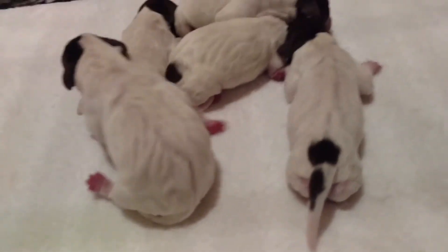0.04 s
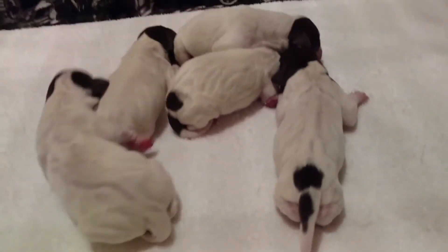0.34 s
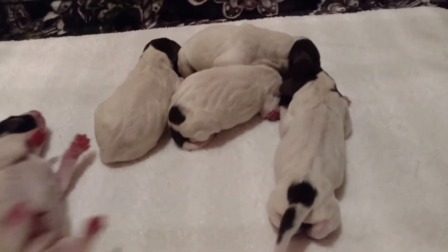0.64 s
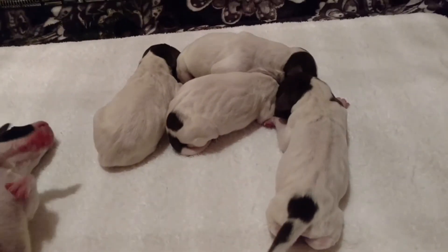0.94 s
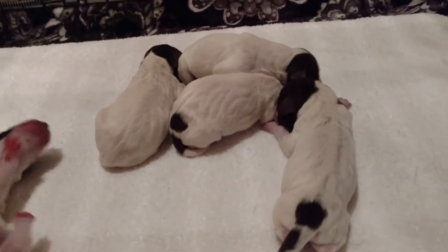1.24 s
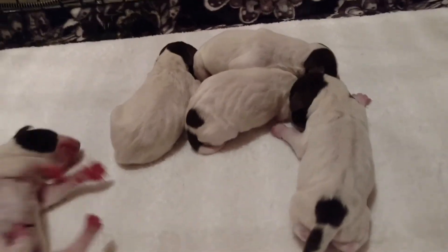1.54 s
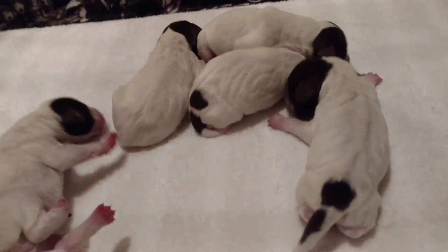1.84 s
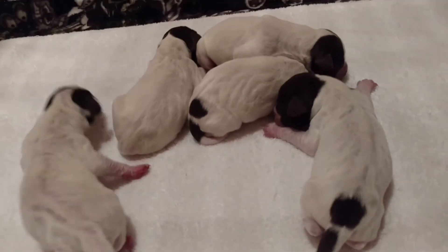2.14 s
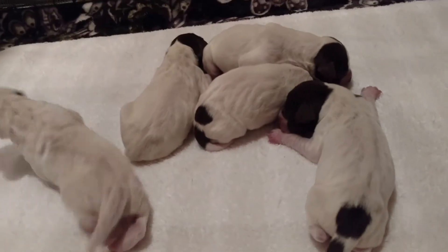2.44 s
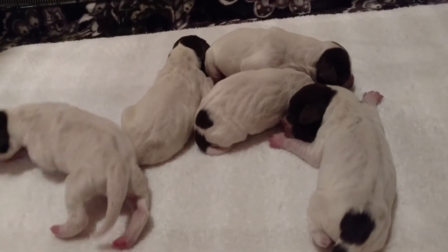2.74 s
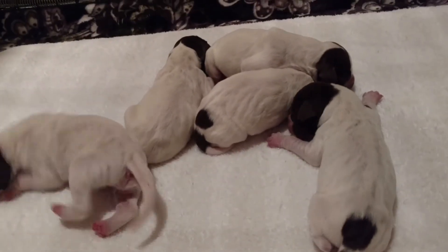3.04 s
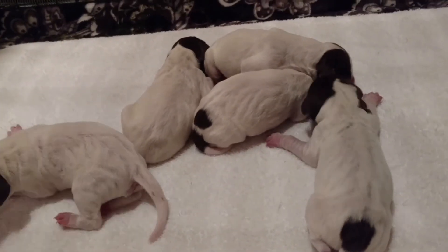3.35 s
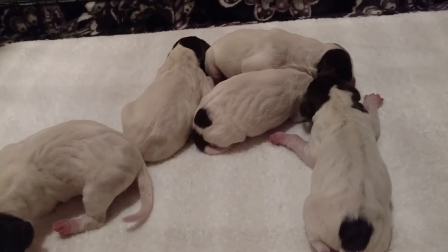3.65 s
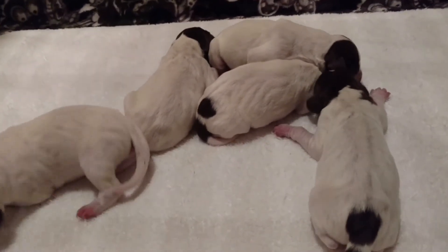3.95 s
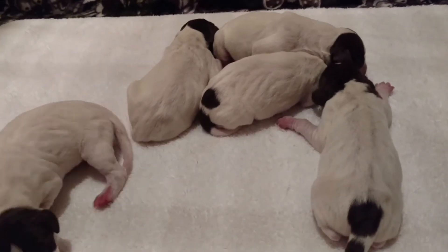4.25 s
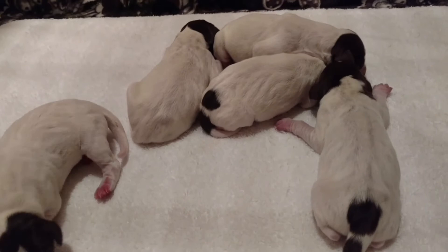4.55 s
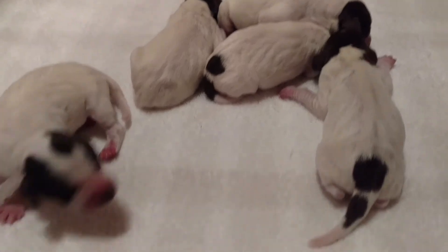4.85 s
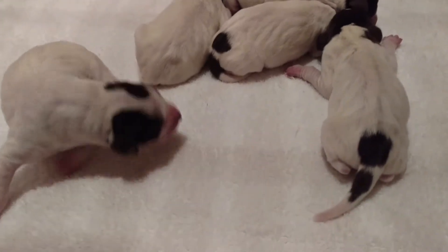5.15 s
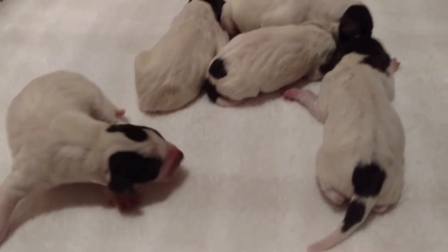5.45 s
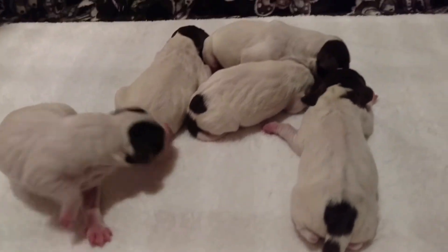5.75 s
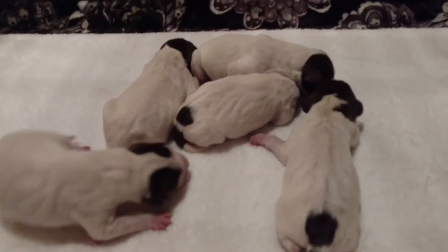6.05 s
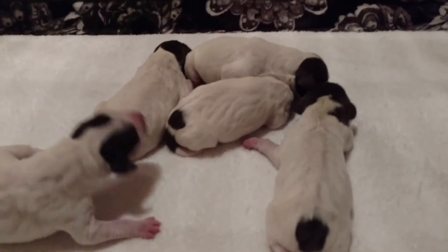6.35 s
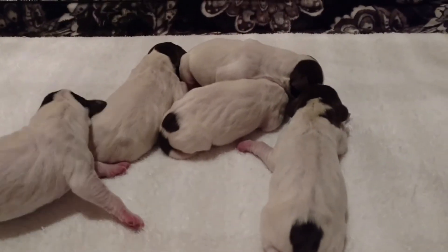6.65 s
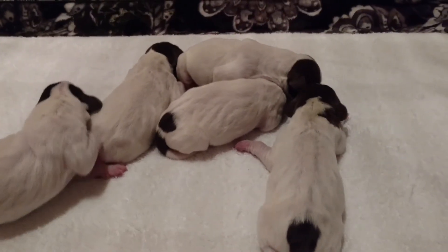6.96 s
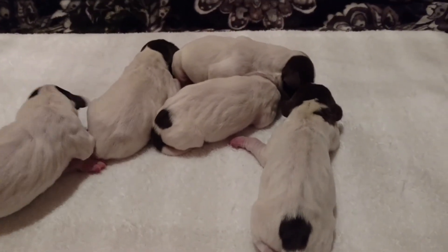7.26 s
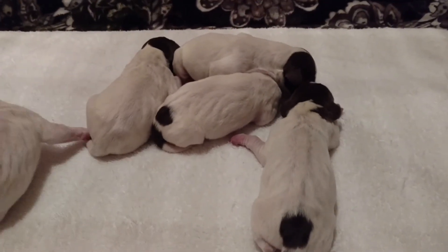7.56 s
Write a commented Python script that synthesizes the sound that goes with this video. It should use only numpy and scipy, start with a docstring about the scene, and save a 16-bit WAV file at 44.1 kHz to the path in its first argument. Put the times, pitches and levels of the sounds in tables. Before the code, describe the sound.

Short, muffled puppy whimpers grow into shrill, wavering squeals, over faint blanket rustles, some handling clicks and a low room hum.

```python
"""A small room, with newborn puppies on a blanket: short, closed-mouth whimpers grow into long, open
squeals while littermates whine faintly. Each cry is a source and a filter: vibrating vocal folds make
harmonics, and the throat and mouth colour them. The blanket rustles, breaths hiss faintly, and fingers
set a camera case ringing in short clicks, over room air and mains hum. Two close microphones pick up
the sound and its reflections, and the recorder widens their stereo image."""
import sys
import numpy as np
from scipy import signal
from scipy.fft import rfft, irfft, next_fast_len
from scipy.io import wavfile
from scipy.ndimage import uniform_filter1d

SR = 44100
rng = np.random.default_rng(int(sys.argv[2]) if len(sys.argv) > 2 else 0)


def unload_audio(sound):
    """Save the sound as a 16-bit wav file, at the path given as the first command line argument."""
    columns = np.transpose(np.atleast_2d(sound))
    # keep every value between -1 and 1, then stretch to whole-number steps
    steps = np.round(np.clip(columns, -1, 1) * 32767)
    wavfile.write(sys.argv[1], SR, steps.astype(np.int16))


N = 340383

# The course of each squeal; brightness is the source level of harmonics 3 and up against the first.
# time_s, pitch_hz, level_db, bright_db
SQUEAL_1 = [(4.097, 1047.0, -14, -19), (4.126, 928.0, -12.5, -20.5), (4.215, 1206.0, -15.0, 19.5),
            (4.255, 1386.0, -11, 20), (4.309, 1251.0, -18, 15.5), (4.375, 1009.0, -23.5, 4),
            (4.425, 751.0, -25.5, 2.5), (4.479, 748.0, -32.5, -12), (4.547, 1021.0, -24, -9),
            (4.657, 1000.0, -27, -10), (4.735, 1173.0, -31, -26)]
SQUEAL_2 = [(4.99, 834, -26.5, -34.5), (5.049, 948, -15.5, -34), (5.097, 1238, -10, -8),
            (5.153, 1306, -15.0, 15), (5.223, 1188, -17, 12), (5.253, 1206, -17.5, -9),
            (5.288, 1035.0, -20, 3), (5.349, 986, -21, -3.5), (5.405, 845, -23, 0.5),
            (5.474, 1072, -23.5, -1), (5.618, 1119, -24.5, 1.0), (5.69, 1072, -18, -19.0)]
SQUEAL_3 = [(5.975, 1037, -30.5, 0.5), (5.997, 1159, -13, -11.5), (6.077, 1264, -16.0, -20),
            (6.143, 1280, -9.5, -18), (6.204, 1348, -12, -23), (6.268, 1182, -11, -17.5),
            (6.34, 1257, -11, -18.0), (6.4, 1137, -15.5, -9), (6.446, 1093, -15.5, -9.5),
            (6.537, 941, -19, -29)]
SQUEAL_4 = [(6.765, 1044, -21, -32), (6.799, 1114, -25, -14.5), (6.844, 1447, -24, -7),
            (6.906, 1296, -12.5, -3), (6.926, 1352, -13.0, 1), (6.975, 1219.0, -16.0, -4.5),
            (7.024, 1228, -12.0, -8.5), (7.121, 1157, -13.5, -17.0), (7.203, 1218, -21.5, -23)]
SQUEAL_5 = [(7.425, 1120, -16.5, -23), (7.443, 1068, -21.5, -21), (7.454, 1290, -17, -26),
            (7.521, 1407, -14.5, -0.5), (7.558, 1388, -21.5, 14), (7.583, 1393.0, -13.5, -2.5),
            (7.63, 1589, -20.5, 3), (7.661, 1510, -16.5, -2.5), (7.77, 1341.0, -31, 5)]
# Open-mouthed squeals: course, then the timbre columns: second_harmonic_db, resonance_hz, resonance_db,
# tilt_db_per_octave, left_lead_ms, left_over_right_db, breath_db
SQUEALS = [(SQUEAL_1, -2.8, 2600, 0.89, -5.5, 0.19, 6.7, -37.5),
           (SQUEAL_2, 4.9, 6300, 7, 2.4, 0.13, 9.8, -26.5), (SQUEAL_3, -1.5, 7700, 5, 0.9, 0.14, -6, -39),
           (SQUEAL_4, 0, 7150, 4.1, 0, .17, -.7, -34.5), (SQUEAL_5, -6, 5100, 7.1, -3, 0.27, 7.3, -42)]
# Closed-mouth whimpers, an arch of pitch on a glide: start_s, end_s, first_hz, last_hz, top_s, arch_hz,
# half_length_s, first_db, top_db, last_db, bright_db, then the timbre columns
WHIMPERS = [(1.117, 1.27, 426.4, 484, 1.228, 121.6, .026, -25, -16, -21.5, -0.5, -2.5, 2720, 9, 0, .17, 3.5, -19),
            (1.491, 1.728, 488, 521.6, 1.59, 49.6, 0.047, -31.5, -29.5, -24.5, 10.5, -4.5, 3210, 2, -1.5, .19, 2, -45),
            (2.009, 2.309, 362.3, 463, 2.14, 209.6, 0.093, -29.5, -22.5, -24.5, -0.5, -0.5, 1580, 7, 3, .13, 3, -40),
            (2.554, 2.773, 821, 535.7, 2.638, 280.3, .044, -26, -21, -15, 5.5, 1.5, 1720, 10, -12, .21, 9.5, -38),
            (3.06, 3.245, 551.5, 424, 3.066, 118, .011, -36, -27.5, -20.5, 6, -1, 2100, 5, -11, 0.19, 6.5, -39)]
# The whimper that breaks upwards: time_s, pitch_hz, level_db, bright_db
BREAKING_COURSE = [(3.505, 373, -29.5, -0.5), (3.555, 595, -21.5, 13), (3.571, 810, -31.5, -7.5),
                   (3.595, 799, -19.5, 9), (3.635, 970, -18, 15), (3.678, 795, -16.5, 9),
                   (3.726, 647.5, -18.5, 7), (3.818, 620, -12.5, 2)]
# Grunts: start_s, end_s, first_hz, last_hz, first_db, last_db, bright_db, roughness, left_over_right_db
GRUNTS = [(.176, 0.237, 720, 401.4, -38, -27.5, -2, .05, 5),
          (0.55, 0.585, 466, 317, -38.5, -32.5, -3.5, .4, 4.9),
          (.796, 0.838, 475, 317.4, -25.5, -29.5, -4, .22, 5.5),
          (5.917, 5.955, 1033, 826, -35, -39, 12.5, .05, 4),
          (6.796, 6.837, 1071, 503, -39.5, -27.5, -2.5, .05, 0)]
# Littermates' whines: start_s, end_s, first_hz, middle_hz, last_hz, first_db, last_db, bright_db
WHINES = [(0.878, 1.116, 545, 527, 501, -43, -36, -2), (4.53, 4.698, 877, 805, 713, -44, -42, 10.5),
          (4.716, 4.895, 1030, 1003, 882, -48.5, -41.5, 1.5), (7.46, 7.728, 760, 587, 670, -46, -48, -1.5)]
# The collapse as breath runs out: length_s, drop_octaves, fall_db, roughness
SQUEAL_END = (0.0253, 0.91, -5.5, 0.51)
WHIMPER_END = (.03, 0.15, -8, 0.08)
# Cracks in the voice: time_s, half_length_s, roughness, pitch_step_fraction
VOICE_CRACKS = [(1.2, .015, 0.13, -0.0024), (1.709, 0.0062, 0.04, -0.034), (2.696, .02, 0.21, 0),
                (3.556, 0.016, .3, .1), (3.795, 0.011, 0.28, -0.065), (4.387, 0.019, 0.09, -0.042),
                (5.059, 0.0046, 0.04, 0.076), (5.15, 0.018, 0.19, 0.0098), (5.231, 0.013, 0.17, 0.038),
                (5.268, .006, 0, -0.064), (5.363, 0.0082, 0.2, -.07), (6.443, 0.023, 0, 0.012),
                (6.909, 0.011, 0.07, 0.023), (6.964, 0.0065, 0.07, -0.038), (7.504, 0.011, 0.35, 0.037),
                (7.615, 0.013, 0.05, 0.038)]
# Response of the throat with the mouth closed and open: frequency_hz, gain_db
THROAT_CLOSED = [(400, 5.5), (800, -2), (1200, 0), (1600, -14), (2000, -18.5), (2500, -25), (3200, -37),
                 (4500, -54.5), (6000, -56.5), (9000, -81.5), (14000, -73.5)]
THROAT_OPEN = [(600, -7), (1200, 4.5), (2000, -3), (2800, -5), (3500, -6.5), (4100, -17), (4800, -26.5),
               (5600, -26.5), (6300, -31.5), (7300, -51.5), (8800, -43), (10000, -38), (11500, -42.5),
               (15000, -80)]
# Finger taps on the camera: time_s, level_db, treble_db, thud_db
FINGER_TAPS = [(.2498, -5.5, -12, -38), (0.632, -24.5, -8, -30), (1.055, -28, 0, -30),
               (1.086, -14, -10, -24.5), (1.3481, 2.5, 0, -45), (1.3741, -30, -14, -18.5),
               (1.4284, -40, 0.5, -30), (1.446, -28.5, -19, -22.5), (1.453, -14.5, -29, 5),
               (3.505, -31.5, -9, -26), (4.27, -26.5, -10, -10), (4.73, -43, -10, -25),
               (5.96, -24, -29, -8)]
# Modes of its case: frequency_hz, level_db, t60_s
CASE_MODES = [(658, 1.5, 0.0053), (1500, -0.5, 0.0015), (3310, 7, 0.0022), (5200, 12, 0.0014),
              (8270, -8, 0.0039)]
# Soft swishes: blanket rustles and, in the last two rows, the puppies' faint, high breath hisses.
# time_s, half_length_s, level_db, tilt_db_per_octave
SWISHES = [(0.018, 0.2, -52.5, 3.5), (0.287, 0.083, -50.5, 1.5), (0.844, 0.031, -58, 4),
           (1.099, 0.025, -50.5, 2), (1.228, 0.058, -53, 7), (2.762, 0.068, -52, -1), (3.728, 0.11, -55, 4),
           (4.66, .05, -59, 9.5), (6.492, .05, -59, 6.5)]
# Spectrum of a swish before its tilt: frequency_hz, density_db
SWISH_SPECTRUM = [(300, -17), (1500, 7), (3500, 1), (6500, -7), (10000, -15.5), (13000, -16),
                  (16000, -23.5)]
# Reverberation time of the room: frequency_hz, t60_s
ROOM_DECAY = [(250, 0.9), (1000, 1.01), (2500, 1.3), (4000, 1.15), (6000, 1), (14000, 0.6)]
# Colour of the reverberation: frequency_hz, gain_db
ROOM_COLOUR = [(300, -0.5), (1000, -2), (2000, 1), (3000, -2), (4000, -8), (5500, -7.5), (14000, -14)]
# Room air, in phase and in antiphase at the two microphones: frequency_hz, density_db
AIR_MID = [(25, -88), (50, -85.5), (80, -66.5), (130, -68.5), (240, -65.5), (400, -78.5), (700, -79.5),
           (1700, -90), (2600, -91), (4000, -100), (6500, -101), (10000, -108), (14000, -119)]
AIR_SIDE = [(25, -98), (50, -94), (80, -73.5), (130, -76.5), (240, -75), (400, -85.5), (700, -86.5),
            (1700, -84), (2600, -94.5), (4000, -99), (6500, -101), (10000, -108), (14000, -115)]
# Mains hum: frequency_hz, level_db
MAINS_HUM = [(120, -50), (239, -51)]
# Dips in the background level: bottom_s, fall_s, depth_db, hold_s, recovery_s
BACKGROUND_DIPS = [(1.357, 0.0099, -9, 0.53, 0.73), (4.28, 0.13, -12.5, 0.086, 1.37),
                   (5.2, 0.38, -9, 0.22, 1.06), (7.65, 0.18, -11, 0.22, 0.91)]

BAND_LIMIT_HZ = 15700


def squeal(course, *timbre):
    """Open-mouth radiation: a long cry keeps its upper harmonics and ends in a steep drop of pitch."""
    t, pitch, level_db, bright_db = glide(course)
    return cry(t, *run_out(t, pitch, level_db, bright_db, *SQUEAL_END), THROAT_OPEN, *timbre)


def whimper(start, end, first_hz, last_hz, top_s, arch_hz, half_s, first_db, top_db, last_db, bright_db,
            *timbre, attack_s=0.014, attack_db=-10.5, arch_bright_db=2.5):
    """Low-pass filtering by a closed mouth: one push of breath arches pitch and brightness together."""
    t = span(start, end)
    arch = bell(t, top_s, half_s)
    pitch = np.interp(t, [start, end], [first_hz, last_hz]) + arch_hz * arch
    level_db = np.interp(t, [start, top_s, end], [first_db, top_db, last_db])
    level_db += attack_db * np.exp((t[0] - t) / attack_s)
    bright_db = bright_db + arch_bright_db * arch
    return cry(t, *run_out(t, pitch, level_db, bright_db, *WHIMPER_END), THROAT_CLOSED, *timbre)


def breaking_whimper():
    """A pitch break: the low voice cracks, leaps up and sinks back, with the mouth still closed."""
    t, pitch, level_db, bright_db = glide(BREAKING_COURSE)
    return cry(t, *run_out(t, pitch, level_db, bright_db, *WHIMPER_END), THROAT_CLOSED, second_db=0.5,
               resonance_hz=3410, resonance_db=3.5, tilt_db=0.5, lead_ms=0.21, pan_db=5.5, breath_db=-35.5)


def grunt(start, end, first_hz, last_hz, first_db, last_db, bright_db, roughness, pan_db):
    """Irregular vibration of the folds roughens a brief downward slide."""
    t = span(start, end)
    pitch = np.geomspace(first_hz, last_hz, len(t))
    level_db = np.linspace(first_db, last_db, len(t))
    return cry(t, pitch, level_db, bright_db, roughness, THROAT_CLOSED, second_db=-2, resonance_hz=1900,
               resonance_db=6, tilt_db=-2, lead_ms=0.11, pan_db=pan_db, breath_db=-24.5)


def whine(start, end, first_hz, middle_hz, last_hz, first_db, last_db, bright_db):
    """Nearly periodic vibration gives a thin, smooth tone that bends once."""
    t = span(start, end)
    pitch = np.interp(t, [start, (start + end) / 2, end], [first_hz, middle_hz, last_hz])
    level_db = np.linspace(first_db, last_db, len(t))
    return cry(t, pitch, level_db, bright_db, roughness=0, throat=THROAT_CLOSED, second_db=-3.5,
               resonance_hz=2100, resonance_db=2.5, tilt_db=3, lead_ms=0.076, pan_db=0.5, breath_db=-39)


def cry(t, pitch, level_db, bright_db, roughness, throat, second_db, resonance_hz, resonance_db,
        tilt_db, lead_ms, pan_db, breath_db, harmonics=20, flutter_db=2.18, fade_s=0.0082):
    """Source-filter model: the tract shapes harmonics and breath. Returns start time and stereo sound."""
    pitch, cycles, strength = vocal_folds(t, pitch, level_db, roughness)
    tract = (throat, resonance_hz, resonance_db, tilt_db)
    delay_s = np.array([[0], [lead_ms / 1000]])
    voice, power = np.zeros((2, len(t))), 0
    for k in range(1, harmonics + 1):
        source_db = 0
        if k > 1:
            source_db = second_db + 0.64 * bright_db if k == 2 else bright_db
            source_db = source_db + flutter_db * wander(len(t), 45)
        partial = gain_of(source_db + vocal_tract(k * pitch, *tract)) * (k * pitch < BAND_LIMIT_HZ)
        voice += partial * np.cos(2 * np.pi * k * (cycles - pitch * delay_s))
        power += partial ** 2
    voice += gain_of(breath_db + bright_db / 2) * breath(cycles, tract)
    ramp = np.clip(np.minimum(t - t[0], t[-1] - t) / fade_s, 0, 1)
    envelope = strength * np.sin(np.pi / 2 * ramp) ** 2
    balance = unit_rms(gain_of([[pan_db / 2], [-pan_db / 2]]))
    return t[0], voice / np.sqrt(power) * envelope * balance


def vocal_folds(t, pitch, level_db, roughness, jitter=0.0024, rasp=0.082, shimmer=0.015,
                doubling=0.22, waver_db=0.93, settle_s=0.016):
    """Jitter and shimmer: cycles vary in length and strength, the more so where the voice is rough."""
    steps = 0
    for at, half_s, amount, step in VOICE_CRACKS:
        roughness = roughness + amount * bell(t, at, half_s)
        steps += step / 2 * np.sign(t - at) * np.exp(-abs(t - at) / settle_s)
    pitch = pitch * (1 + steps)
    pitch *= 1 + jitter * wander(len(t), 140) + rasp * roughness * wander(len(t), 450)
    cycles = np.cumsum(pitch) / SR
    strength = gain_of(level_db + waver_db * wander(len(t), 30))
    unevenness = (shimmer + roughness) * wander(len(t), 310)
    alternation = doubling * roughness * np.cos(np.pi * cycles)  # strong and weak cycles take turns
    return pitch, cycles, strength * (1 + unevenness + alternation)


def vocal_tract(hz, throat, resonance_hz, resonance_db, tilt_db, half_octaves=0.46, sparkle_db=4):
    """Formant filtering, in dB: the mouth adds one resonance and a treble slope to the throat's colour."""
    octaves = np.log2(hz + 1)
    sparkle = sparkle_db * np.clip(octaves - np.log2(7000), 0, 1)
    formant = resonance_db * bell(octaves, np.log2(resonance_hz), half_octaves)
    slope = tilt_db * np.maximum(octaves - np.log2(2300), 0)
    return read_spectrum(throat, hz) + sparkle + formant + slope


def breath(cycles, tract):
    """Turbulence: a puff of air escapes through the tract each time the folds part."""
    size = len(cycles)
    puffs = rng.standard_normal((2, SR))[:, :size] * (1 + np.cos(2 * np.pi * cycles))
    puffs = np.diff(puffs, prepend=0)  # turbulence is brighter than the buzz
    response = gain_of(vocal_tract(np.fft.rfftfreq(SR, 1 / SR), *tract))
    return unit_rms(irfft(rfft(puffs, SR) * response, SR)[:, :size])


def run_out(t, pitch, level_db, bright_db, length_s, drop_octaves, fall_db, roughness):
    """Loss of driving pressure: as breath runs out, pitch and level fall and the voice turns rough."""
    spent = np.clip(1 - (t[-1] - t) / length_s, 0, 1)
    return pitch * 2 ** (-drop_octaves * spent), level_db + fall_db * spent, bright_db, roughness * spent


def camera_clicks(thud_hz=220, thud_t60_s=0.017, right_db=-3):
    """Impact excitation: a fingertip sets the damped modes of the case ringing over a low thud."""
    out, t = np.zeros((2, N)), np.arange(2048) / SR
    for start_s, level_db, treble_db, thud_db in FINGER_TAPS:
        ring = 0
        for hz, mode_db, t60_s in CASE_MODES:
            decay = gain_of(mode_db + treble_db * (hz > 2000) - 60 * t / t60_s)
            ring += decay * np.sin(2 * np.pi * hz * t)
        ring = signal.lfilter([1, 1], [2], ring)  # soft fingertips blunt the attack
        thud = gain_of(thud_db - 60 * t / thud_t60_s) * np.sin(2 * np.pi * thud_hz * t)
        add(out, start_s, gain_of([[level_db], [level_db + right_db]]) * (ring / abs(ring).max() + thud))
    return out


def soft_swishes(grain_db=2, grain_hz=180):
    """Friction and turbulence noise: the blanket's rustles and the puppies' faint, high breath hisses."""
    out, t = np.zeros((2, N)), np.arange(SR // 2) / SR
    for centre_s, half_s, level_db, tilt_db in SWISHES:
        colour = [(hz, db + tilt_db * np.log2(hz)) for hz, db in SWISH_SPECTRUM]
        swish = unit_rms(np.array([noise(colour, len(t)), noise(colour, len(t))]))
        start_s = max(centre_s - t.mean(), 0)
        strength = gain_of(level_db + grain_db * wander(len(t), grain_hz))
        add(out, start_s, strength * bell(start_s + t, centre_s, half_s) * swish)
    return out


def near_echoes(x, count=10, span_s=0.014, corner_hz=2500):
    """Early reflections: floor and furniture scatter the overtones differently to each microphone."""
    taps = np.zeros((2, SR // 20))
    delays = (rng.uniform(0.05, 1, (2, count)) * span_s * SR).astype(int)
    np.put_along_axis(taps, delays, rng.choice([-1., 1.], delays.shape) / np.sqrt(count), 1)
    treble = signal.sosfilt(signal.butter(2, corner_hz, "high", fs=SR, output="sos"), x)
    return signal.oaconvolve(treble, taps, axes=1)[:, :N]


def reverberation(x, gap_s=0.0083, incoherent_hz=1500):
    """A diffuse field: each band decays at its own rate, and close microphones share the low ones."""
    hz, t, bands = signal.stft(rng.standard_normal((2, SR)), SR, nperseg=256)
    coherence = np.sinc(hz / incoherent_hz)[:, None]
    bands[1] = coherence * bands[0] + np.sqrt(1 - coherence ** 2) * bands[1]
    decay_db = read_spectrum(ROOM_COLOUR, hz)[:, None] - 60 * t / read_spectrum(ROOM_DECAY, hz)[:, None]
    tail = signal.istft(bands * gain_of(decay_db), SR, nperseg=256)[1]
    tail *= np.clip(np.arange(tail.shape[1]) / SR / gap_s - 1, 0, 1)  # silent for the gap, then fades in
    mono = x.mean(axis=0, keepdims=True)
    return signal.fftconvolve(mono, tail / np.linalg.norm(tail[0]), axes=1)[:, :N]


def background(level_db=-1):
    """Partly coherent noise of room air, with a faint mains hum; the level dips and creeps back."""
    t = np.arange(N) / SR
    hum = sum(gain_of(db) * np.sqrt(2) * np.sin(2 * np.pi * hz * t) for hz, db in MAINS_HUM)
    mid, side = noise(AIR_MID) + hum, noise(AIR_SIDE)
    dips_db = [np.interp(t, [at - fall, at, at + hold, at + hold + recovery], [0, db, db, 0])
               for at, fall, db, hold, recovery in BACKGROUND_DIPS]
    return np.array([mid + side, mid - side]) * gain_of(level_db + np.min(dips_db, axis=0))


def glide(course, smooth_samples=560):
    """A moving average rounds the corners of a course; returns time, pitch, level and brightness."""
    times, *columns = np.transpose(course)
    t = span(times[0], times[-1])
    return t, *(uniform_filter1d(np.interp(t, times, column), smooth_samples) for column in columns)


def span(start, end, margin_s=0.003):
    """The sample times of one cry."""
    return np.arange(start - margin_s, end + margin_s, 1 / SR)


def noise(spectrum, size=N):
    """Spectral shaping gives white noise the stated power density."""
    padded = next_fast_len(size, True)
    colour = gain_of(read_spectrum(spectrum, np.fft.rfftfreq(padded, 1 / SR)))
    return irfft(rfft(rng.standard_normal(padded)) * colour, padded)[:size] * np.sqrt(SR / 2)


def wander(size, rate_hz):
    """Random modulation of rms about 1, mostly below the given rate."""
    position = np.arange(size) * 2 * rate_hz / SR
    knots = rng.standard_normal(2048)
    return np.interp(position, np.arange(len(knots)), knots) * np.sqrt(3 / 2)


def read_spectrum(points, hz):
    """Interpolation on a logarithmic frequency axis."""
    frequencies, values = np.transpose(points)
    return np.interp(np.log(hz + 1), np.log(frequencies), values)


def bell(x, centre, half_width):
    """A Gaussian curve of height 1."""
    return np.exp(-((x - centre) / half_width) ** 2)


def gain_of(db):
    """Decibels to amplitude ratio."""
    return 10 ** (np.asarray(db) / 20)


def unit_rms(x):
    """Normalisation to rms 1."""
    return x / np.sqrt(np.mean(x ** 2) + 1e-20)


def add(mix, start_s, sound):
    """Superposes a stereo sound on the mix."""
    part = mix[:, max(round(start_s * SR), 0):][:, :sound.shape[1]]
    part += sound[:, :part.shape[1]]


def scene(echo_db=-9, reverb_db=-19):
    """Superposition: the litter's direct sound, its reflections and the small noises around it."""
    puppies = np.zeros((2, N))
    for call, rows in (grunt, GRUNTS), (whimper, WHIMPERS), (squeal, SQUEALS), (whine, WHINES):
        for row in rows:
            add(puppies, *call(*row))
    add(puppies, *breaking_whimper())
    reflections = gain_of(echo_db) * near_echoes(puppies) + gain_of(reverb_db) * reverberation(puppies)
    return puppies + reflections + camera_clicks() + soft_swishes() + background()


def record(dry, crossfeed=0.79, delay_samples=17):
    """Antiphase crossfeed widens the image; the signal is then held to full scale and band-limited."""
    late_opposite = np.pad(dry[::-1], ((0, 0), (delay_samples, 0)))[:, :N]
    wide = np.clip(dry - crossfeed * late_opposite, -1, 1)
    low_pass = signal.firwin(255, BAND_LIMIT_HZ, window=("kaiser", 9), fs=SR)
    return signal.oaconvolve(wide, low_pass[None], "same")


dry = scene()
out = record(dry)
unload_audio(out)
```